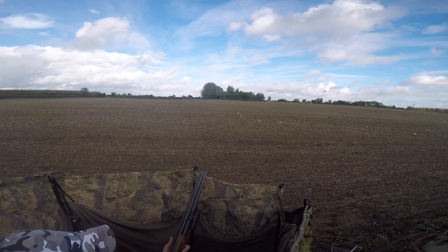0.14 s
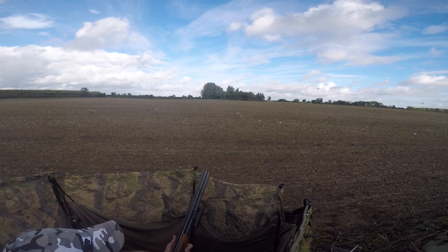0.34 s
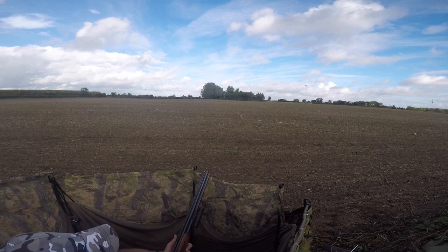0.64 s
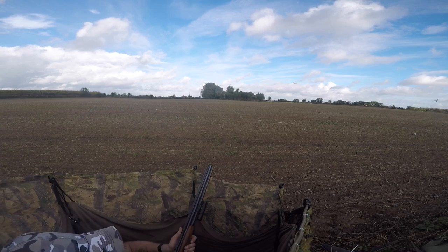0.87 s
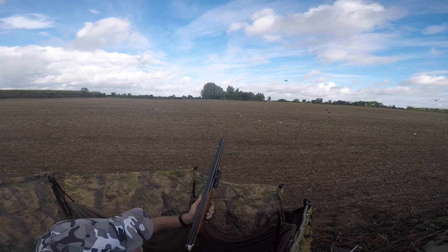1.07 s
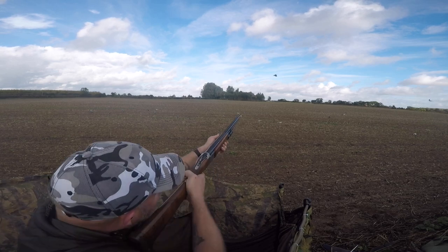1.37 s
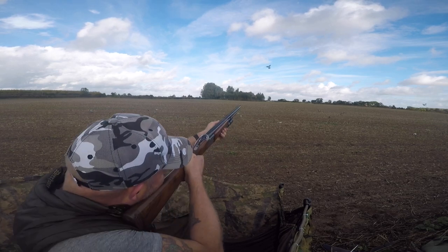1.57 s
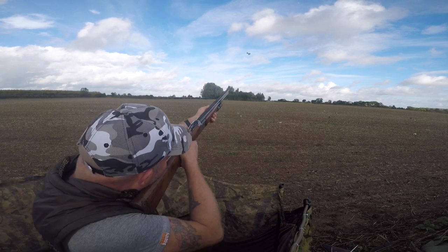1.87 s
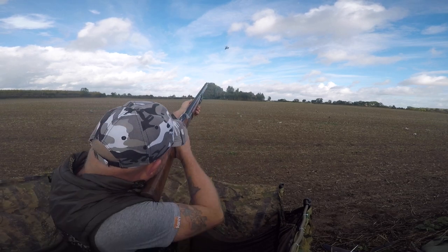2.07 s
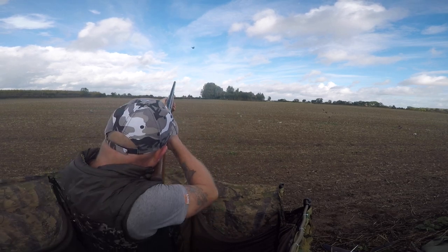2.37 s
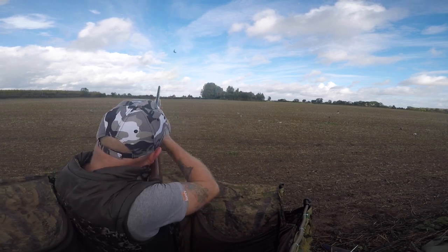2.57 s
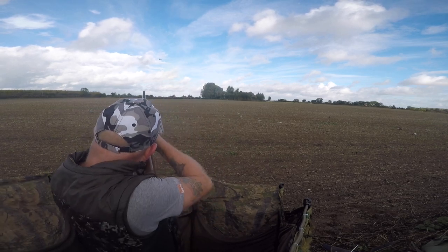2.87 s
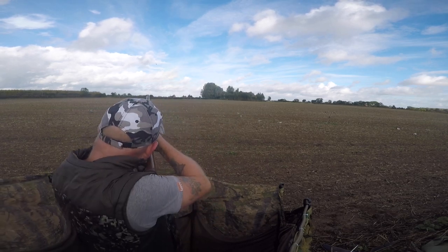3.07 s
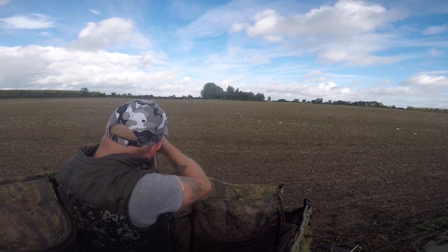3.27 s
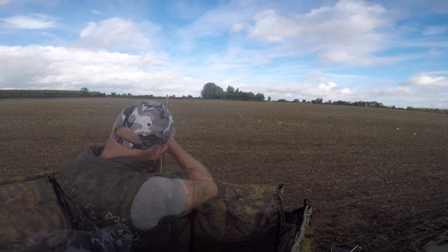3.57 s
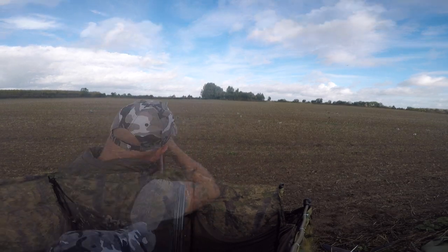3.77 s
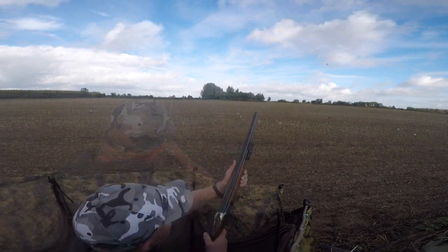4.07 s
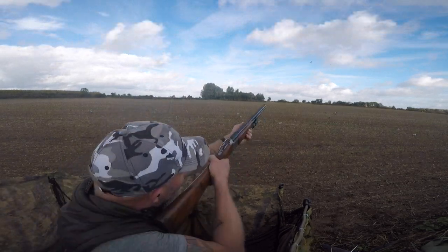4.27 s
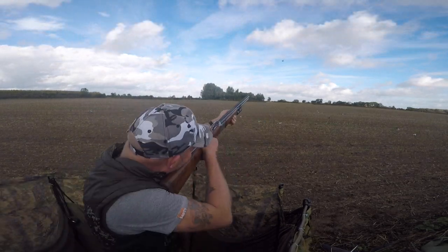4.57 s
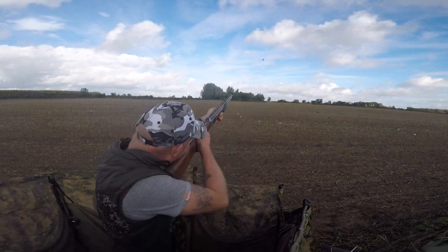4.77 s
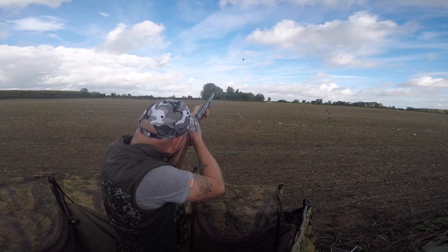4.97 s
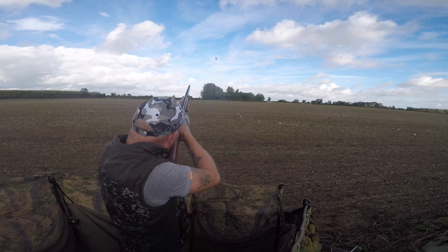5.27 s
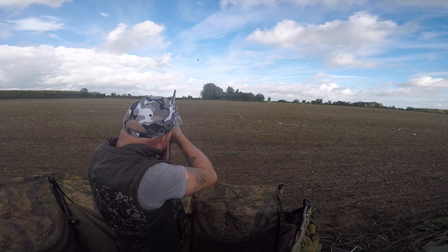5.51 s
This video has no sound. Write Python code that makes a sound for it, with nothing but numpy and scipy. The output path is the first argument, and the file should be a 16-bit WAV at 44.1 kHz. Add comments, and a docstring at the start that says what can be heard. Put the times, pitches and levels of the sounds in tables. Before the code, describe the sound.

Deep wind buffets a small camera microphone on an open field, with a strong thump near 0.2 s and a faint wide airy hiss. Around 0.8-1.1 s the camera shudders, cloth brushes and the gun clicks. At 1.17 s the first shotgun shot cracks, thinner and leaning right; a dull rolling echo comes back from the trees and a narrow hiss slides down in pitch. Small clicks at 2.1 s and more rustle precede a fuller, clipped blast at 2.4 s, prefaced by a rapid duller stutter. A third heavy blast hits at 3.42 s, with quieter wind afterwards. Low shakes, handling clicks and rustles run from 3.7 to 4.6 s, then wind bumps build until the fourth overloaded shot at 5.1 s. Each shot leaves a short splash and faint hush; the background drops away and creeps back, with a soft low echo near 5.4 s.

```python
"""Four shotgun shots from a hide on an open field, heard by a small camera just behind the shooter.
First lumpy noise bands make wind on the microphone; short noise bursts click and rustle as he takes aim.
Each report stutters in on duller early copies, then a filtered impulse with a dense spray clips at full scale.
Wind and air drop away at each shot and creep back; noise washes and thunder roll back faintly from field
and trees. A narrow hiss, falling in pitch, follows the first shot as its pellets fly off."""
import sys
import numpy as np
from scipy import signal
from scipy.fft import rfft, irfft
from scipy.io import wavfile
from scipy.ndimage import uniform_filter1d

SR = 44100
rng = np.random.default_rng(int(sys.argv[2]) if len(sys.argv) > 2 else 0)


def to_wav(s):
    """Save 16-bit WAV."""
    ch = np.atleast_2d(s).T  # columns
    pcm = np.round(np.clip(ch, -1, 1) * 32767)  # PCM
    wavfile.write(sys.argv[1], SR, pcm.astype(np.int16))


N = 248724
TIME = np.arange(N) / SR

# The shots: (time [s], blast [dB], thump [dB], stutter [dB], whistle [dB], case ring [dB], near tail [dB],
#  treble tilt [dB per octave], left-right difference [dB], bounce delay [s], bounce share [1],
#  far thunder [dB], far hush [dB], fall of the hush [dB per s], dip of the background [dB])
SHOTS = [(1.1694, -8.5, -14.5, -14.5, -28, -46, -40, 1.3, -14, 0.00037, -0.41, -32, -43, 52, 15),
         (2.4059, 5, -13.5, -5, -18.5, -15, -37.5, -0.43, 3.5, 0.00069, -0.039, -44.5, -53, 25.5, 32.5),
         (3.4243, 6.5, -12, -19.5, -40, -5.5, -37.5, -1.22, 0, 0.0009, 0.22, -49, -49, 60.5, 8),
         (5.1014, 3.5, -14.5, -2, -26, 1.5, -39, 0.57, 0, 0.0012, -0.5, -45, -52.5, 42.5, 31.5)]
# Open-field sound at the two microphone ports:
# (frequency [Hz], left-right likeness [-1 to 1], left-right difference [dB])
FIELD_PORTS = [(60, 0.98, 1.5), (305, .9, -4), (580, 0.33, -16), (1050, 0.82, 0.5), (2240, 0.95, -0.5),
               (4500, 0.3, -3.5), (7500, 0.28, -4.5), (12000, 0.16, -3.5)]
# Airy sound at the ports: (frequency [Hz], left-right likeness [-1 to 1], left-right difference [dB])
AIR_PORTS = [(100, .5, 5), (300, -0.51, -5), (1130, -0.57, 0), (2350, 0.0038, 0), (4360, 0.31, 0.5),
             (7360, -0.14, -5), (11940, -0.54, -1)]


def shots():
    """Each blast thumps the camera mount and rings the camera case, after a stutter and before a near tail."""
    # Mount modes: (frequency [Hz], relative level [dB], t60 [s])
    mount_modes = [(120, 4, 0.066), (288, 4.5, 0.021), (460, -9.5, 0.05)]
    lead_s = 0.06
    out = np.zeros((2, N))
    t = np.arange(2 ** 15) / SR - lead_s
    for (s, blast_db, thump_db, stutter_db, whistle_db, case_db, tail_db,
         tilt_db, pan_db, bounce_s, bounce, *_) in SHOTS:
        thump = amp(thump_db) * sum(amp(db) * ring(t, hz, t60_s) for hz, db, t60_s in mount_modes)
        case = amp(case_db) * ring(t, 6620, 0.0057)
        direct = amp(blast_db) * blast(t, tilt_db, bounce_s, bounce)
        report = sides(pan_db) * (direct + case) + thump
        lead_in = amp(stutter_db) * stutter(report, t) + amp(whistle_db) * whistle(t)
        add(out, s - lead_s, report + lead_in + amp(tail_db) * tail(t))
    return out


def blast(t, tilt_db, bounce_s, bounce, spread_s=0.00096, scatter=0.28, apart=1.0, ripple=0.5, swing_rad=1.5):
    """The shock front, its bounce off the gun and a dense spray of close reflections."""
    # Muzzle blast before tilt: (frequency [Hz], relative level [dB])
    blast_spectrum = [(30, -9.5), (130, 6.5), (420, 4), (650, -2.5), (1200, 1), (2100, -3), (3000, -6),
                      (4600, -9), (7000, -4), (9000, -11), (11500, -23), (15000, -23.5)]
    shared, left, right = rng.standard_normal((3, len(t)))
    spray = (shared + apart * np.array([left, right])) * (t > 0) * np.exp(-abs(t) / spread_s)
    impulse = signal.unit_impulse(len(t), np.argmax(t >= 0))
    front = rfft(impulse + scatter * spray)
    front /= np.hypot(abs(front), ripple)  # the spray smears the front but colours it only a little
    hz = bins(t)
    front *= 1 + bounce * np.exp(-2j * np.pi * hz * bounce_s)  # the bounce cuts a row of notches
    front *= np.exp(1j * swing_rad * np.tanh(hz / 300))  # the push is followed by an equal suction
    response = causal([(f, db + tilt_db * np.log2(f / 2000)) for f, db in blast_spectrum])
    wave = irfft(front * rfft(response, len(t)))
    return 4 * lean(wave / np.linalg.norm(wave, axis=1, keepdims=True), FIELD_PORTS)


def ring(t, hz, t60_s):
    """One struck mode: a sine with exponential decay."""
    age = np.maximum(t, 0)
    return np.sin(2 * np.pi * hz * age) * amp(-60 * age / t60_s)


def stutter(report, t, fall_db=-5.1, fade_db=-7, haze_db=-13, haze_s=0.0171,
            droop_s=0.0014, droop_hz=700, count=4):
    """Duller chirping copies of alternating sign run up to the report, inside a short swelling haze."""
    # Colour of the copies against the report: (frequency [Hz], gain [dB])
    copy_colour = [(40, -11.5), (160, 11), (300, -18.5), (420, 3.5), (560, -1), (850, 13.5), (1100, -8),
                   (2000, -10), (3500, -9), (7000, -16), (10000, -18.5), (14000, -28.5)]
    # Haze: (frequency [Hz], relative level [dB])
    haze_spectrum = [(40, 5), (170, 19.5), (400, -1), (900, 9.5), (1200, -2), (2200, -1.5), (4500, -5),
                     (7000, -3.5), (9500, -14), (12000, -34), (16000, -49)]
    spacing_s = 0.01067
    hz = bins(t)
    droop = np.exp(-2j * np.pi * droop_s * droop_hz * (1 - np.exp(-hz / droop_hz)))  # bass comes last
    dull = colour(irfft(rfft(report[::-1]) * droop), copy_colour)  # the copies lean to the other side
    out = amp(haze_db) * run_up(t, haze_s) * evened(colour(noise(len(t)), haze_spectrum))
    for k in range(count):
        gain = (-1) ** (k + 1) * amp(fall_db * k + fade_db * k * (k - 1.5))
        out += gain * np.roll(dull, -round((k + 1) * spacing_s * SR), 1)
    return out


def whistle(t, swell_s=0.018):
    """A thin high zip, narrow-band noise, swells into the report."""
    tone = steadied(band(len(t), 7940, 0.012), 0.004)
    return sides(-2.5) * tone * run_up(t, swell_s)


def tail(t, splash_db=17, splash_s=0.005, soil_s=0.024):
    """The hide throws back a quick splash, the soil a longer hush."""
    # Scatter from hide and soil: (frequency [Hz], relative level [dB])
    scatter_spectrum = [(40, 2.5), (200, -4), (500, 0.5), (1100, -8), (2500, -9), (5000, -15.5), (7500, -6),
                        (10000, -16), (12000, -29), (16000, -36.5)]
    age = np.maximum(t, 0)
    fade = amp(splash_db) * np.exp(-age / splash_s) + np.exp(-age / soil_s)
    return (t > 0) * fade * evened(colour(noise(len(t)), scatter_spectrum))


def rolls():
    """The field returns each shot as a fading hush with a hollow note, the trees as a dull, lumpy thunder."""
    # Hush of the field: (frequency [Hz], relative level [dB])
    hush_spectrum = [(100, -9.5), (350, 4.5), (700, -2), (1400, -9), (2500, -12), (4000, -18.5),
                     (7500, -15.5), (10000, -22.5), (12000, -37), (16000, -55.5)]
    # Thunder of the trees: (frequency [Hz], relative level [dB])
    thunder_spectrum = [(80, -12), (170, 9.5), (240, 4.5), (320, -3.5), (420, -21), (800, -30.5),
                        (1500, -39), (12000, -100)]
    hush_rise_s = 0.051
    treble_hz, dulling_db_per_s = 2500, 15  # the treble of the hush dies sooner
    thunder, hush, hiss, hollow = np.zeros((4, N))
    for s, *_, thunder_db, hush_db, fall_db_per_s, _ in SHOTS:
        age = np.maximum(TIME - s, 0)
        rise = np.minimum(age / hush_rise_s, 1)
        thunder += amp(thunder_db) * bloom(age, peak_s=0.23, rise_db_per_s=49.5, fall_db_per_s=49)
        hush += rise * amp(hush_db - fall_db_per_s * age)
        hiss += rise * amp(hush_db - (fall_db_per_s + dulling_db_per_s) * age)
        hollow += amp(-65) * bloom(age, peak_s=0.14, rise_db_per_s=70.5, fall_db_per_s=71)
    wash = evened(colour(noise(N, AIR_PORTS), hush_spectrum))
    dull = colour(wash, [(treble_hz / 2, 0), (treble_hz * 2, -20)])
    trees = thunder * steadied(colour(noise(N), thunder_spectrum), 0.31)
    field = hush * dull + hiss * (wash - dull)
    return trees + field + hollow * band(N, hz=1040, octaves=0.11)


def echoes():
    """Single echoes from hedges and woods at the edges of the field, as soft noise bands."""
    # (time [s], level [dB], half length [s], centre [Hz], width [octaves])
    echo_rows = [(1.205, -46.5, 0.036, 810, 0.32), (1.275, -45, 0.043, 537, 0.62),
                 (1.37, -60, 0.1, 1540, 1), (1.39, -34, 0.044, 238, 0.28), (1.60, -62, 0.032, 763, 0.061),
                 (5.38, -45.5, 0.089, 223, 0.37)]
    return swells(echo_rows)


def pellets(width_hz=600):
    """A narrow hiss that falls in pitch as drag slows the pellets of the first shot."""
    muzzle_hz, halving_s, level_db = 10300, 0.57, -59
    age = np.maximum(TIME - SHOTS[0][0], 0)
    lowpass = signal.butter(2, width_hz, fs=SR, output="sos")
    fuzz = signal.sosfilt(lowpass, noise(N) + 1j * noise(N))
    pitch_hz = muzzle_hz / (1 + age / halving_s)
    turn = np.exp(2j * np.pi * np.cumsum(pitch_hz) / SR)
    swell = bloom(age, peak_s=0.16, rise_db_per_s=190.5, fall_db_per_s=67.5)
    return amp(level_db) * evened((fuzz * turn).real) * swell


def handling():
    """Short dry noise clicks of the gun and soft swells of cloth, under one treble colour."""
    # Gun handled and fired, before colour: (time [s], level [dB], t60 [s], centre [Hz], width [octaves])
    clicks = [(1.031, -43, 0.1, 690, 0.47), (1.033, -51.5, 0.16, 2700, 0.29),
              (1.183, -25.5, 0.0061, 7000, 1.2), (1.219, -47, 0.017, 7490, 0.52),
              (2.067, -32.5, 0.045, 376, .65), (2.097, -55, 0.018, 5000, 1.5),
              (2.308, -52, 0.052, 1800, 1.2), (2.362, -39, 0.055, 4587, 0.96),
              (3.383, -49.5, 0.014, 2950, 1.2), (3.798, -53.5, 0.099, 7940, 0.41),
              (3.940, -46, 0.035, 4960, 1.2), (4.111, -41, 0.04, 900, 1.14), (4.164, -45, 0.03, 4200, 0.67),
              (4.549, -51, 0.018, 7450, 0.19), (4.863, -37.5, 0.12, 504, 0.24),
              (5.0586, -26.5, 0.025, 4530, 2.9), (5.256, -49, 0.031, 2800, 1.5)]
    # Sleeves brushing, stock meeting the shoulder, before colour:
    # (time [s], level [dB], half length [s], centre [Hz], width [octaves])
    rustles = [(0.798, -60, 0.18, 7450, 0.3), (0.96, -49.5, 0.011, 8000, 0.41),
               (1.045, -45, 0.017, 740, 0.83), (1.04, -46.5, 0.019, 7600, 0.3),
               (2.337, -46, 0.028, 1400, 0.95), (3.207, -68.5, 0.027, 596, 0.36),
               (4.14, -53, 0.054, 6800, 1), (4.275, -56.5, 0.041, 3980, 1)]
    # Shared colour: (frequency [Hz], gain [dB])
    handling_colour = [(9000, 1), (10500, -7), (12000, -28.5), (16000, -28.5)]
    out = swells(rustles)
    t = np.arange(2 ** 14) / SR
    for s, db, t60_s, hz, octaves in clicks:
        attack = np.minimum(t * hz, 1)  # one period of the centre frequency
        add(out, s, band(len(t), hz, octaves) * attack * amp(db - 60 * t / t60_s))
    return colour(out, handling_colour)


def shudders():
    """A shake of the camera body on its mount moves the two diaphragms in opposite directions."""
    # (time [s], level [dB], half length [s], centre [Hz])
    shakes = [(.86, -22.5, 0.078, 130), (1.06, -26.5, 0.036, 162), (3.70, -28.5, 0.08, 130),
              (3.85, -29, .018, 125), (3.95, -32.5, 0.064, 185), (4.39, -27.5, 0.034, 205),
              (4.56, -41.5, 0.11, 210)]
    width_octaves = 0.32
    shake = swells([(*row, width_octaves) for row in shakes])[1]
    return np.array([shake, -shake])


def gusts():
    """Single buffets of wind, as soft swells of low noise."""
    # (time [s], level [dB], half length [s], centre [Hz], width [octaves])
    buffets = [(.06, -19, 0.016, 116, 0.46), (.18, -12, .03, 50, 0.64), (.51, -17, 0.037, 106.5, 0.43),
               (.905, -18, 0.015, 49.6, 0.62), (1.085, -19, 0.029, 39, .5),
               (2.355, -18.5, 0.015, 108, 0.32), (3.95, -36, 0.022, 34.2, 0.42),
               (4.275, -35.5, 0.057, 45, 0.27), (4.402, -17, 0.021, 120.4, 0.6),
               (4.6, -25.5, 0.044, 46.7, 0.3), (4.755, -17.5, 0.031, 60.5, 0.75),
               (4.865, -17.5, 0.022, 162, 0.6), (4.965, -24, 0.017, 131, 0.82),
               (5.07, -14, 0.03, 112, 0.88)]
    return swells(buffets)


def wind(rumble_db=-1):
    """Eddies push on the ports: a deep rumble and a faster flutter follow the wind's strength, in lumps."""
    # Strength: (time [s], level [dB])
    strength_points = [(0, -20), (0.1, -11), (0.64, -14.5), (0.83, -26), (1.08, -28.5), (1.3, -23),
                       (1.42, -21), (1.85, -32.5), (2.05, -18.5), (2.25, -31), (2.38, -7.5), (2.88, -17),
                       (3.35, -13), (3.5, -30.5), (4.66, -30.5), (4.82, -14.0), (5.08, -13.5),
                       (5.64, -12.5)]
    # Rumble: (frequency [Hz], relative level [dB])
    rumble_spectrum = [(10, -16.5), (25, 3.5), (48, 1), (80, -6), (110, -13), (170, -21), (400, -63),
                       (4000, -140)]
    # Flutter: (frequency [Hz], relative level [dB])
    flutter_spectrum = [(40, -17.5), (85, -9.5), (115, 3), (165, -6), (215, -11), (300, -23), (450, -32.5),
                        (800, -55), (8000, -130)]
    # Wind at the ports: (frequency [Hz], left-right likeness [-1 to 1], left-right difference [dB])
    wind_ports = [(49.6, 0.94, -0.5), (146, 0.8, -3), (304, 0.69, -2)]
    breeze_db, flutter_db = -21, -15  # average strength; flutter relative to it
    growth_db_per_db = 0.9
    rumble_lumps_db, flutter_lumps_db = 2, 3
    strength_db = np.interp(TIME, *np.transpose(strength_points))
    fast_db = breeze_db + flutter_db + growth_db_per_db * (strength_db - breeze_db)
    deep_db = strength_db + rumble_db
    deep = steadied(colour(noise(N, wind_ports), rumble_spectrum), 0.043)
    fast = steadied(colour(noise(N, wind_ports), flutter_spectrum), 0.39)
    deep = deep * amp(deep_db + rumble_lumps_db * lumps())
    return deep + fast * amp(fast_db + flutter_lumps_db * lumps())


def lumps(lump_s=0.07):
    """Slow chance, rms 1: white noise smoothed by a Hann window."""
    window = signal.windows.hann(int(2 * lump_s * SR))
    return evened(signal.fftconvolve(rng.standard_normal(N), window, "same"))


def air():
    """A soft, wide, steady wash of the field: filtered noise in a low body and a high hiss."""
    # Body: (frequency [Hz], relative level [dB])
    body_spectrum = [(100, -3.5), (350, 9), (700, 1), (1400, -5), (2500, -13), (4000, -25.5), (14000, -68)]
    # Hiss: (frequency [Hz], relative level [dB])
    hiss_spectrum = [(1500, -19), (3200, -2.5), (5000, -6.5), (6300, -3), (7700, -1), (10000, -3.5),
                     (11300, -7.5), (13500, -15.5), (16000, -39.5)]
    low = evened(colour(noise(N, AIR_PORTS), body_spectrum)) * amp(-47)
    high = evened(colour(noise(N, AIR_PORTS), hiss_spectrum)) * amp(-57.5)
    return low + high


def dip():
    """Gain of the background: drops at each shot, deeper just after it, and creeps back steadily in dB."""
    recover_db_per_s = 9.5
    clamp_db, clamp_s = 11, 0.094
    down_db = np.zeros(N)
    for s, *_, dip_db in SHOTS:
        age = TIME - s
        sunk = np.maximum(dip_db - recover_db_per_s * age, 0)
        sunk = sunk + clamp_db * np.exp(-(age / clamp_s) ** 2)
        down_db = np.where(age > 0, sunk, down_db)
    return uniform_filter1d(amp(-down_db), size=400)


def run_up(t, swell_s, start_s=0.036, ramp_s=0.021):
    """An envelope that swells up to time zero and stops."""
    return np.exp(-abs(t) / swell_s) * (t < 0) * np.clip((t + start_s) / ramp_s, 0, 1)


def bloom(age, peak_s, rise_db_per_s, fall_db_per_s):
    """An envelope that starts after age zero, grows to a peak and dies away."""
    late = age - peak_s
    level_db = -rise_db_per_s * np.maximum(-late, 0) - fall_db_per_s * np.maximum(late, 0)
    return (age > 0) * amp(level_db)


def swells(rows):
    """Bands of noise that rise and fall softly."""
    out = np.zeros((2, N))
    t = np.arange(-2 ** 13, 2 ** 13) / SR
    for s, db, half_s, hz, octaves in rows:
        envelope = amp(db) * np.exp(-(t / half_s) ** 2)
        add(out, s + t[0], envelope * steadied(band(len(t), hz, octaves), 0.062))
    return out


def noise(size, ports=FIELD_PORTS):
    """White noise at the two ports, with likeness and level difference set by frequency."""
    white = rng.standard_normal((2, size))
    a, b = rfft(white)
    same = np.clip(read(np.array(ports)[:, :2], bins(white)), -1, 1)
    pair = np.array([a, same * a + np.sqrt(1 - same ** 2) * b])
    return lean(irfft(pair, size), ports)


def band(size, hz, octaves):
    """Noise in a bell around a frequency, rms 1."""
    x = noise(size)
    bell = np.exp(-0.5 * (np.log2((bins(x) + 1) / hz) / octaves) ** 2)
    return evened(irfft(rfft(x) * bell, size))


def steadied(x, seconds):
    """Evens out swells slower than the given time."""
    power = signal.fftconvolve((x ** 2).mean(0), signal.windows.hann(int(seconds * SR) + 3), "same")
    return evened(x / np.sqrt(power + power.mean() / 20))


def lean(x, ports):
    """Shades each port by frequency."""
    return irfft(rfft(x) * sides(read(np.array(ports)[:, ::2], bins(x))), x.shape[-1])


def sides(db):
    """Left and right gains for a level difference."""
    return amp(np.array([db, -db]).reshape(2, -1) / 2)


def colour(x, points):
    """Filters by a spectrum without delay."""
    return irfft(rfft(x) * amp(read(points, bins(x))), x.shape[-1])


def causal(points, size=4096):
    """The minimum-phase impulse response with this spectrum, energy 1."""
    log_gain = np.log(amp(read(points, abs(np.fft.fftfreq(size, 1 / SR)))))
    response = np.fft.ifft(np.exp(np.conj(signal.hilbert(log_gain)))).real[:size // 2]
    return response / np.linalg.norm(response)


def read(points, hz):
    """Reads a spectrum on a log-frequency axis."""
    f, value = np.transpose(points)
    return np.interp(np.log(hz + 1), np.log(f + 1), value)


def bins(x):
    """The frequencies of a sound's spectrum, in Hz."""
    return np.fft.rfftfreq(x.shape[-1], 1 / SR)


def amp(db):
    """Decibels to gain."""
    return 10 ** (np.asarray(db) / 20)


def evened(x):
    """Scales to rms 1."""
    return x / np.sqrt(np.mean(x ** 2) + 1e-20)


def add(mix, s, sound):
    """Mixes a sound in at a time in seconds."""
    part = mix[:, max(round(s * SR), 0):][:, :sound.shape[-1]]
    part += sound[..., :part.shape[-1]]


def scene():
    """Everything that reaches the two ports; only the steady wind and air dip."""
    background = dip() * (wind() + air()) + gusts() + shudders()
    return shots() + rolls() + echoes() + pellets() + handling() + background


def record(dry):
    """The microphone overloads: clipping at full scale, then a low-pass band limit."""
    edge_hz = 15600
    clipped = np.clip(dry, -1, 1)
    lowpass = signal.firwin(255, edge_hz, window=("kaiser", 8), fs=SR)
    return signal.oaconvolve(clipped, lowpass[None], "same")


dry = scene()
out = record(dry)
to_wav(out)
```